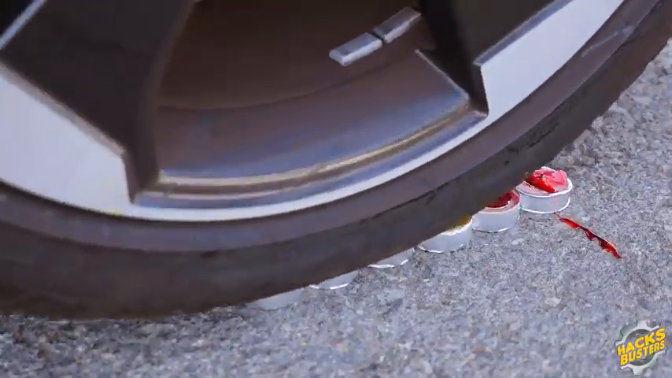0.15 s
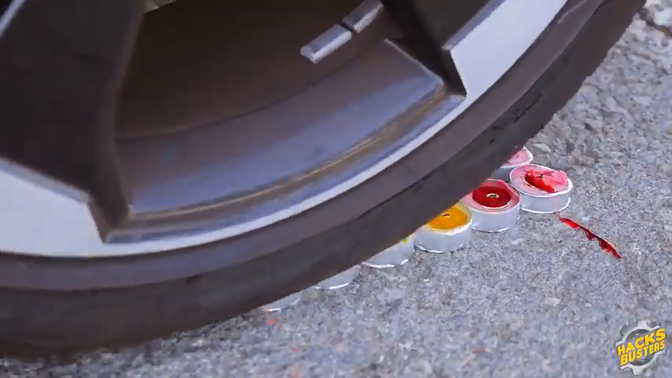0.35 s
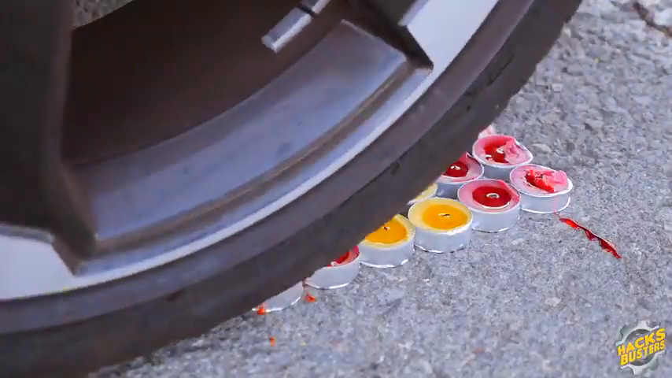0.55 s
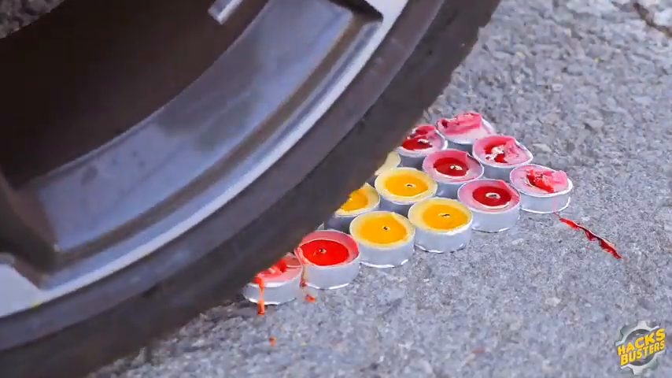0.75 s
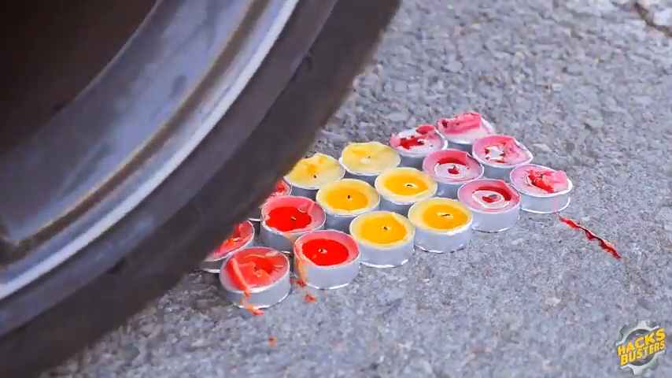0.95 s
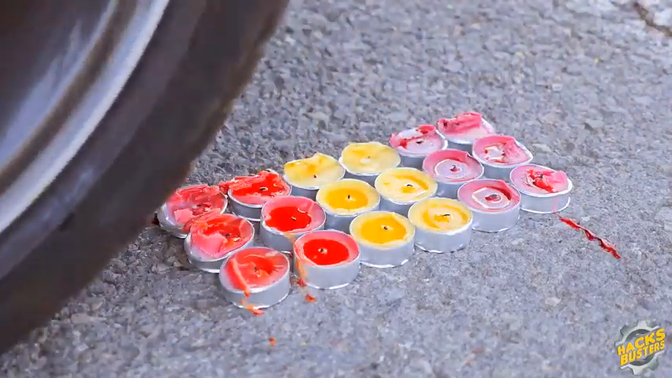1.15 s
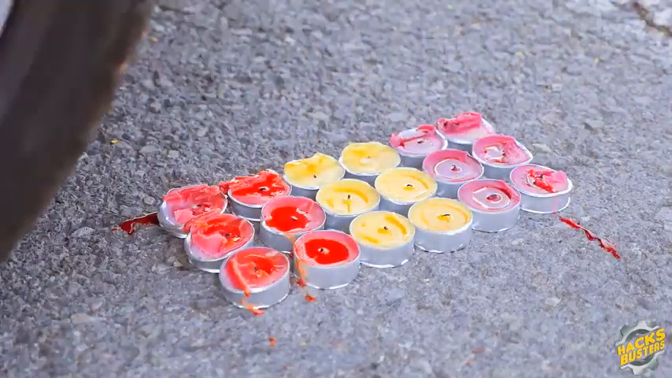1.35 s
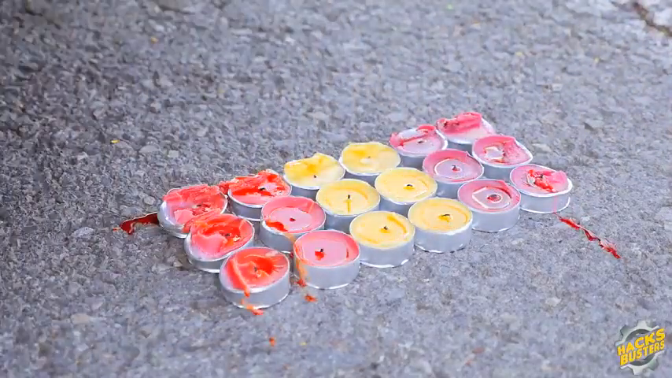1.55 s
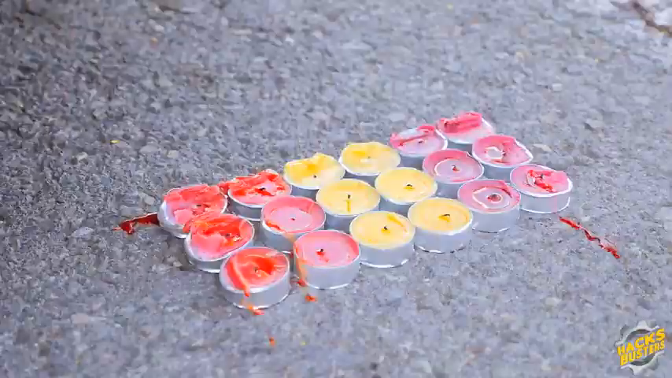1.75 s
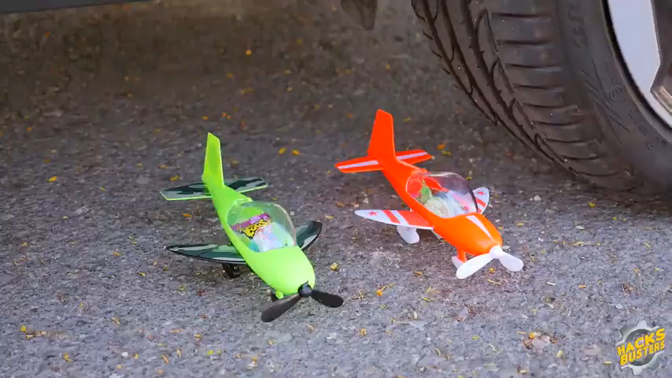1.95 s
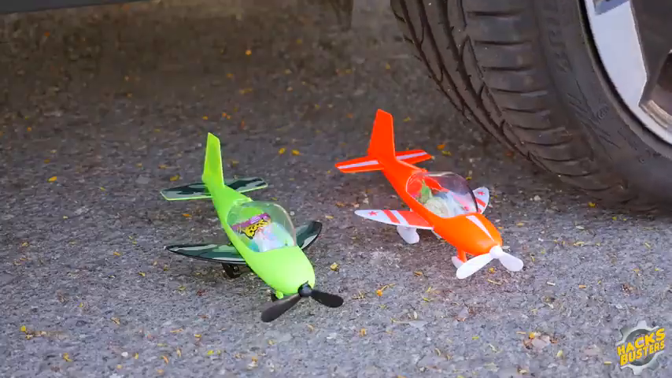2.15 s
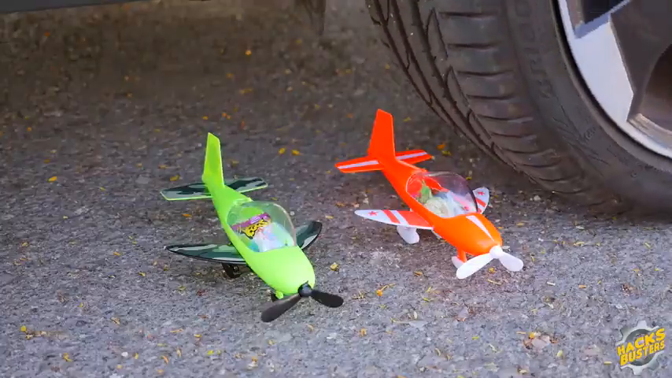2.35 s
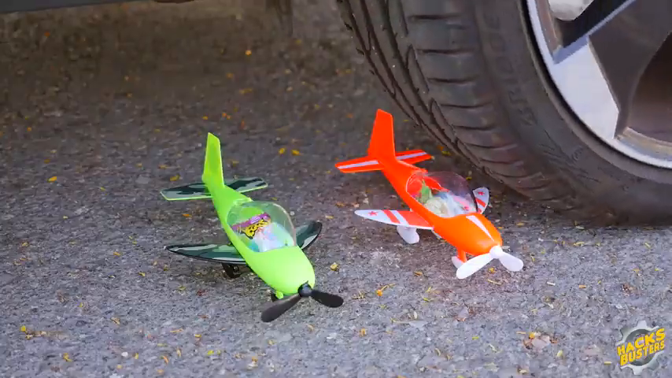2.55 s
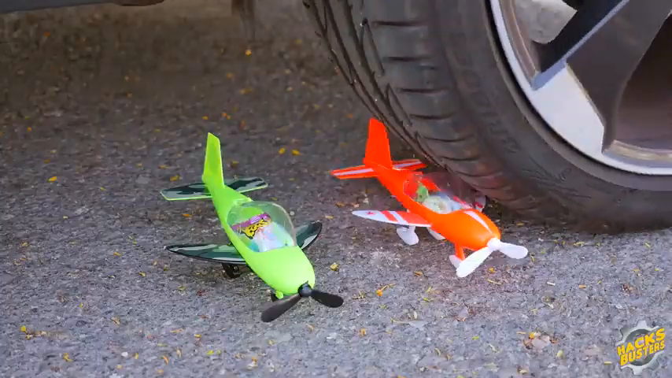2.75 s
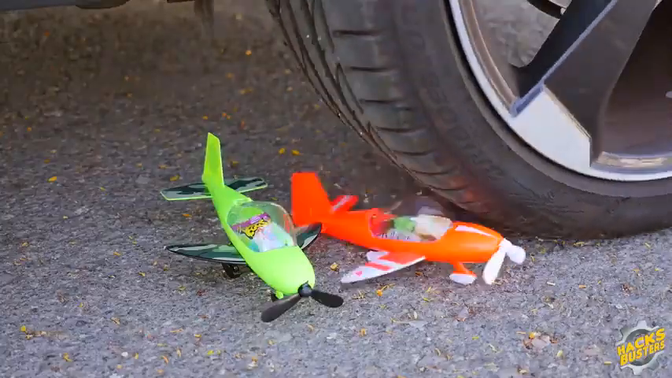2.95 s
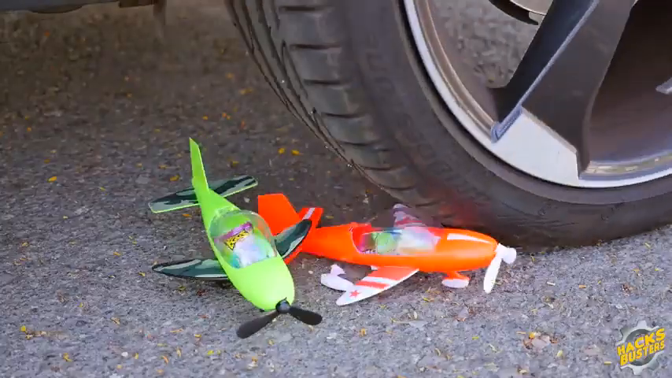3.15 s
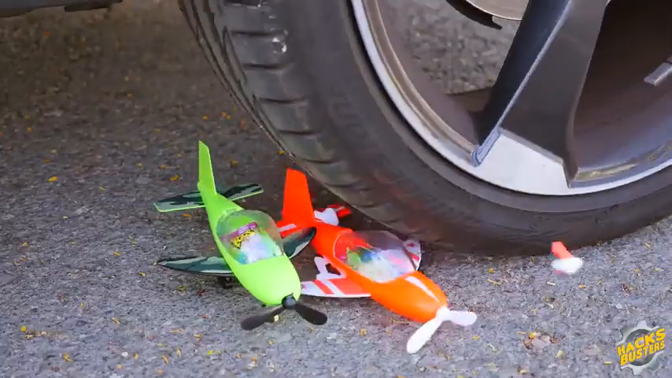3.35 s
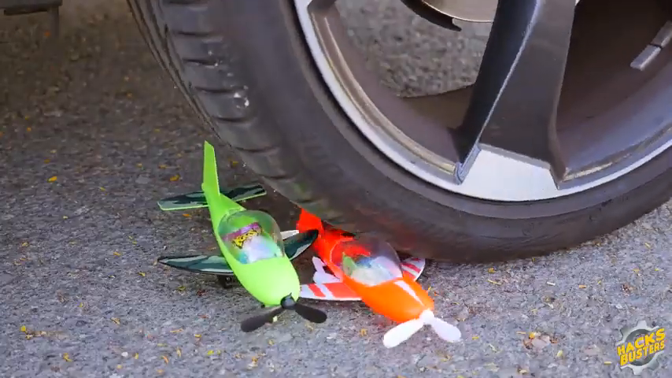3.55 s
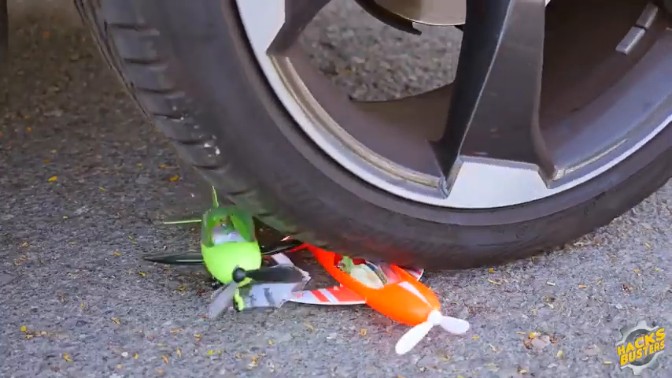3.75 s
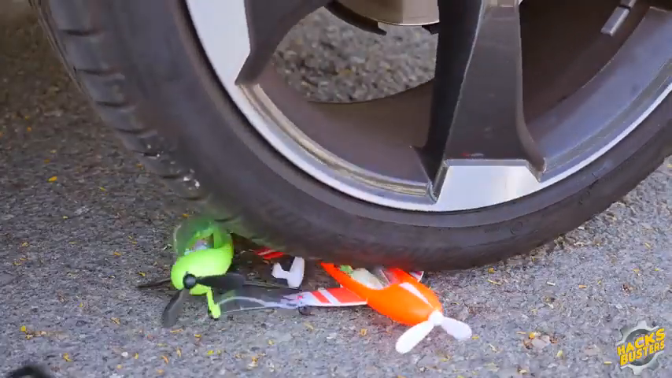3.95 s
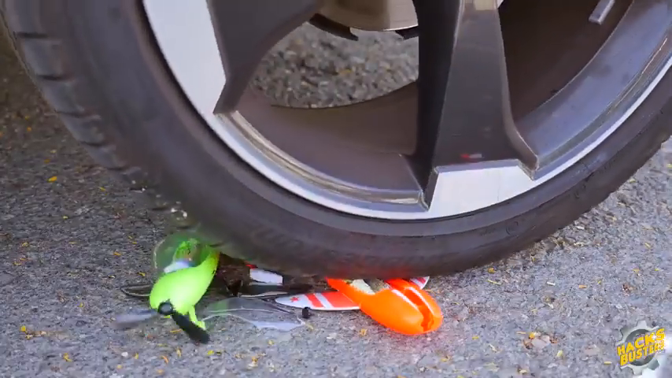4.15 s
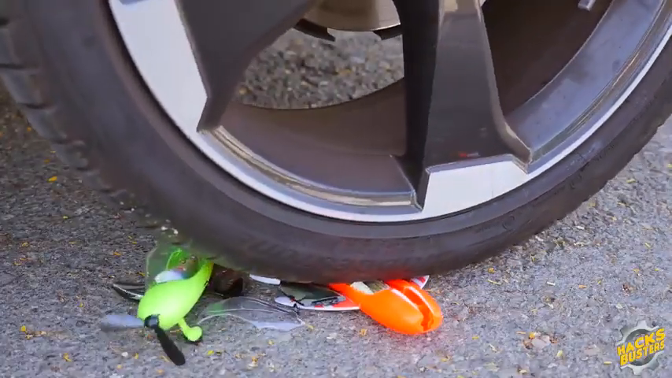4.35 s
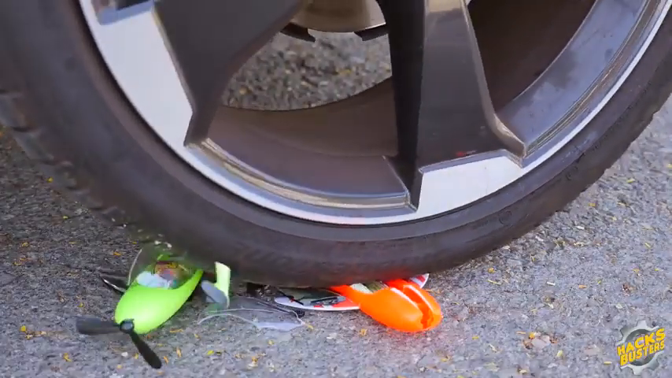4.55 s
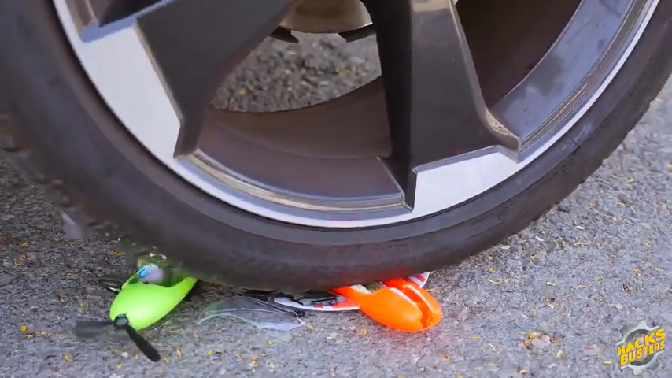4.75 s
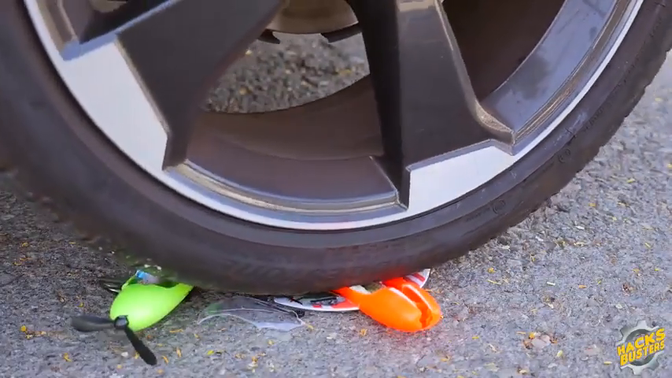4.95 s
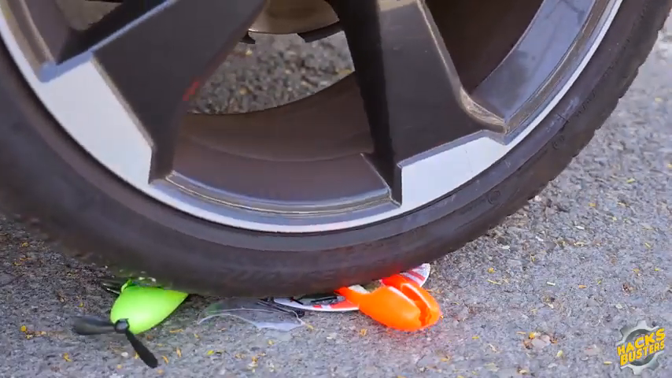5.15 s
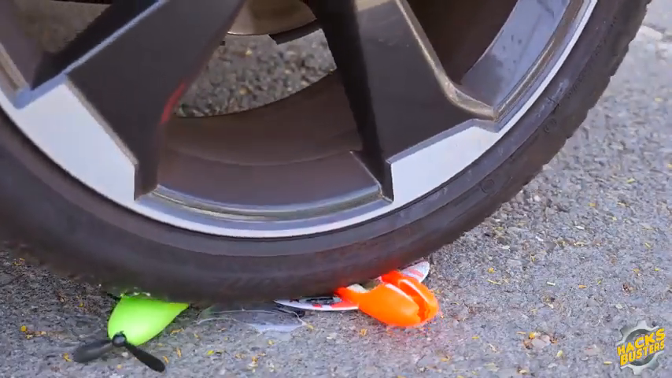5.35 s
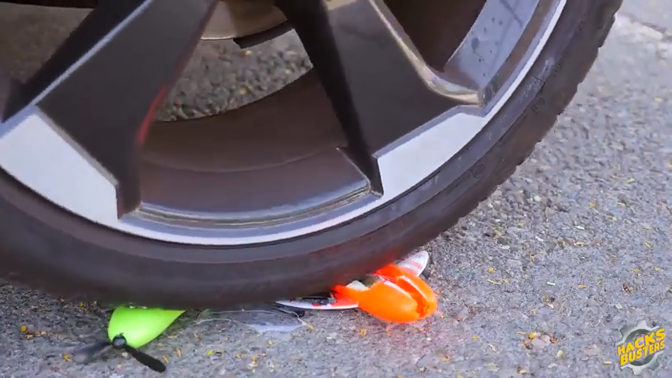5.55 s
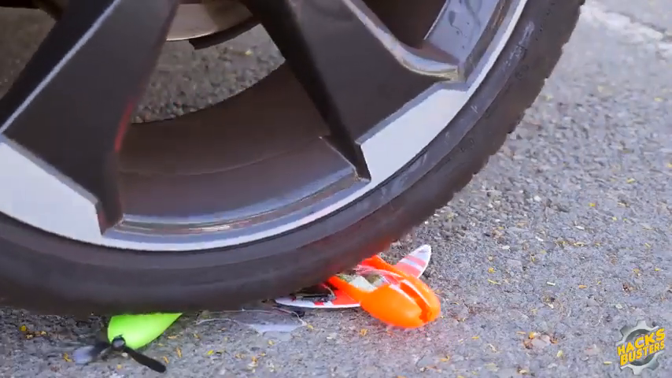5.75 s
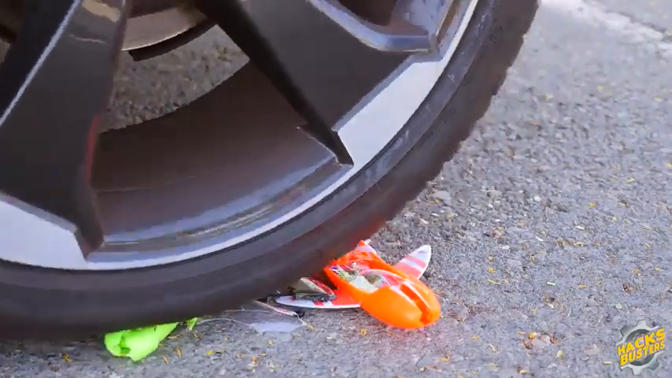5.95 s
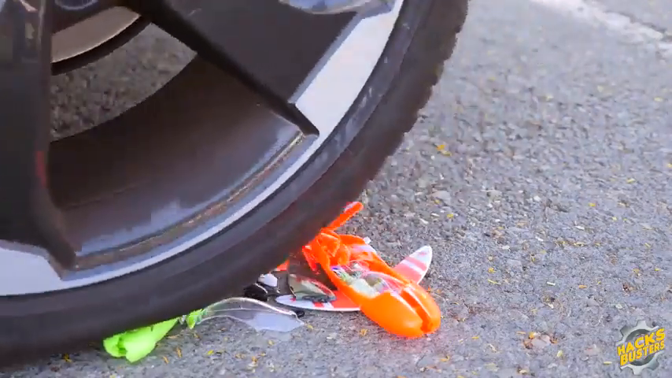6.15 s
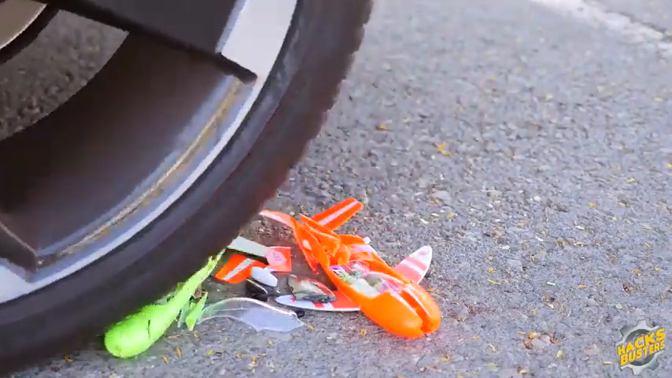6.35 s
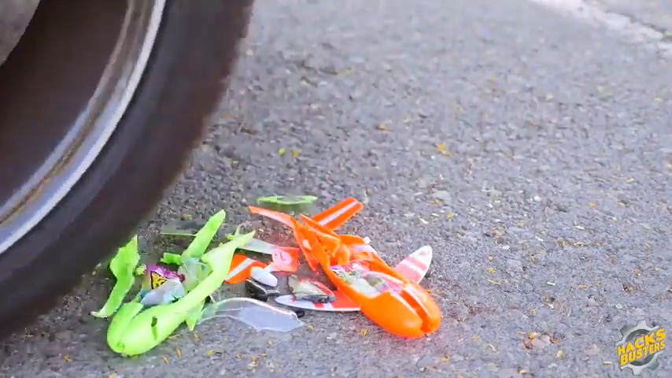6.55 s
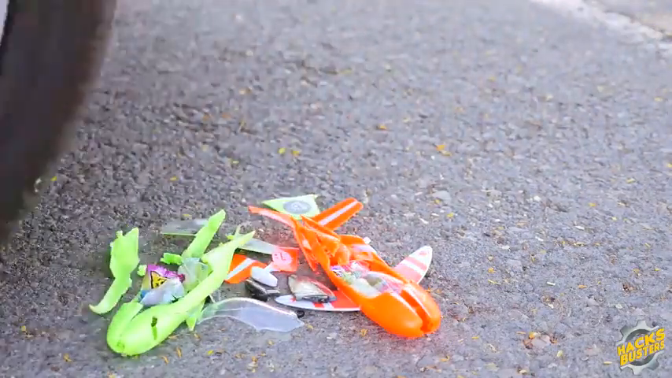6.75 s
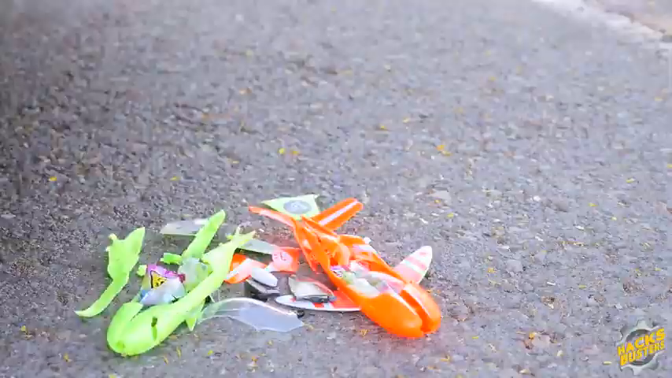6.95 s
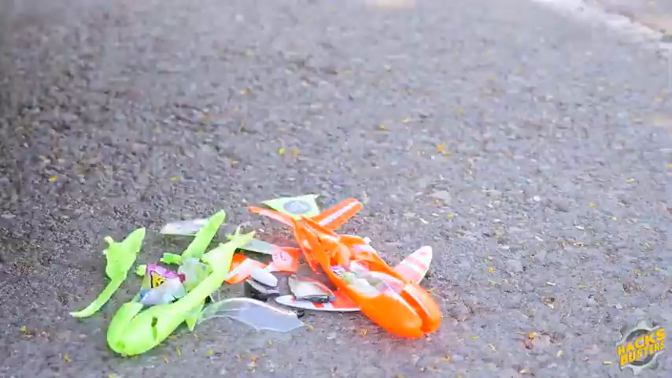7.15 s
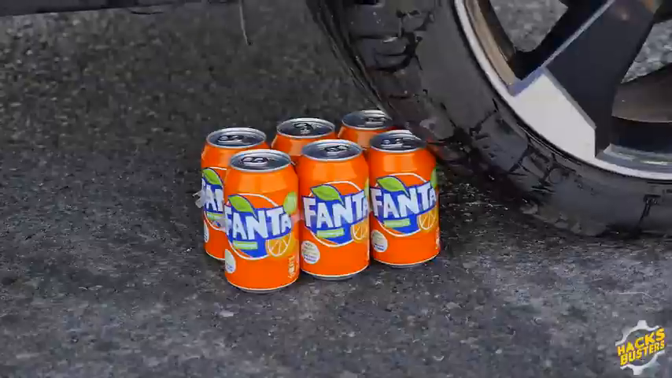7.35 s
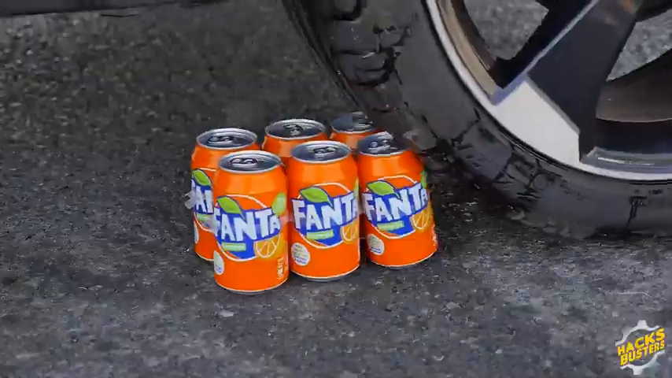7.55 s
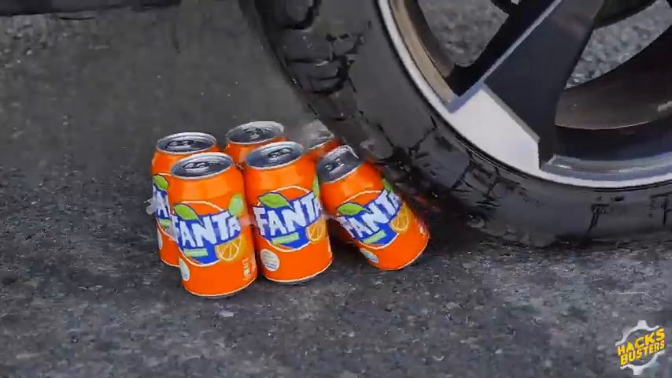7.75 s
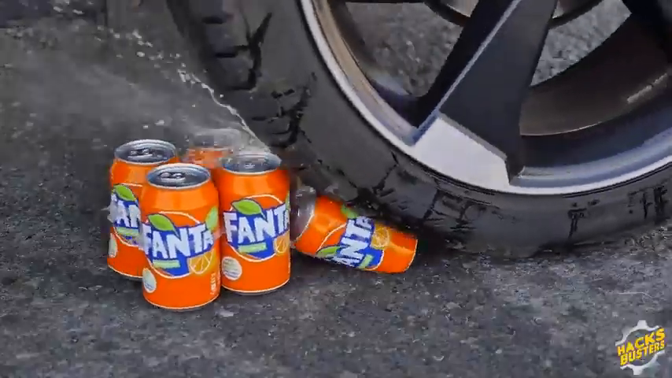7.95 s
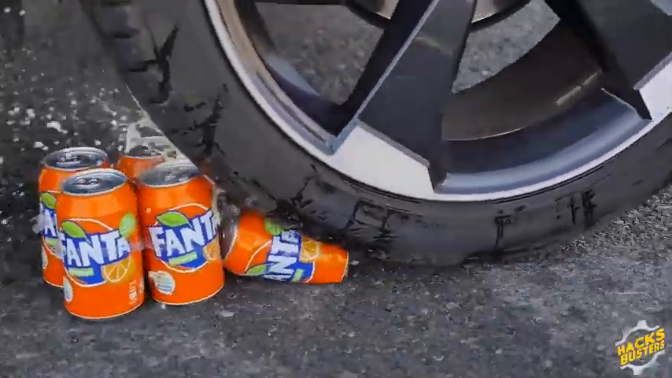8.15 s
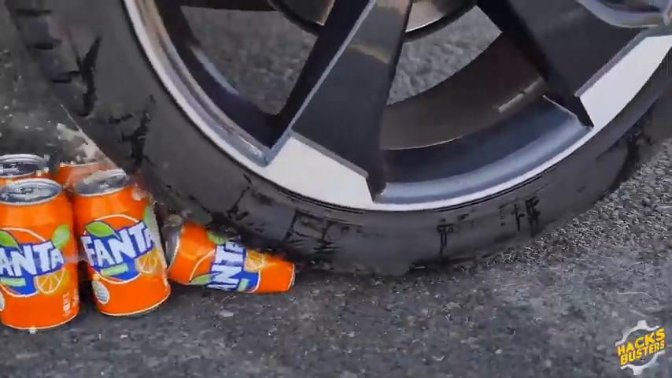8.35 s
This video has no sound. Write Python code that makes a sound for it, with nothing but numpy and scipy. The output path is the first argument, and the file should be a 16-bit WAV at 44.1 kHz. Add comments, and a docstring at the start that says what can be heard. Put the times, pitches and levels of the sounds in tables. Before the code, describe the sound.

Close by on asphalt, a car idles with soft airy hiss and a thin high whine, with two barely audible ticks. Then hollow plastic toys break under a tyre in loud, dense, irregular snaps with scraping fragments and tiny rings. The cracks thin to faint ticks and near quiet. Abruptly the engine is louder, and thin metal cans pop, boom, crumple and spray fizzy liquid until the end.

```python
"""First an idling car engine hisses and whines; two faint ticks follow as the car rolls off wax cups.
The car then cracks two plastic toys: noise bursts snap, pieces scrape, and small parts ring.
In a second shot the engine is suddenly louder, and fizzy drink cans crumple, boom, dent and spray.
Most sounds are shaped noise; the whine and the ringing parts are made of sine waves.
All is heard close by, on asphalt, through one microphone."""
import sys
import numpy as np
from scipy import signal
from scipy.fft import rfft, irfft, next_fast_len
from scipy.io import wavfile
from scipy.ndimage import map_coordinates

SR = 44100
rng = np.random.default_rng(int(sys.argv[2]) if len(sys.argv) > 2 else 0)


def transcribe(u):
    """Save the signal u as a 16-bit wav file named by the first command-line argument.

    u: samples, shape (n,) or (channels, n), limited to [-1, 1]; the rate is SR.
    q: integer samples, one column per channel.
    """
    v = np.clip(np.atleast_2d(u).T, -1, 1)
    q = np.round(v * 32767).astype(np.int16)
    wavfile.write(sys.argv[1], SR, q)


N = 374409  # length in samples


def amp(db):
    """Turns decibels into a plain multiplier."""
    return 10 ** (np.asarray(db) / 20)


def unit(x):
    """Scales a sound to an average (rms) strength of 1."""
    return x / np.sqrt(np.mean(x ** 2, axis=-1, keepdims=True) + 1e-20)


def curve(rows):
    """Joins (time, value) rows with straight lines, one value per sample."""
    return np.interp(np.arange(N) / SR, *np.transpose(rows))


def wobble(rate):
    """A smooth random curve with the given number of random points a second."""
    points = rng.standard_normal(int(N * rate / SR) + 4)
    return map_coordinates(points, [np.arange(N) * rate / SR])


def fade(t, t60):
    """Dies away by 60 dB in t60 seconds."""
    return amp(-60 * t / t60)


def onset(t, seconds):
    """Rises smoothly from silence; a smaller time makes a sharper start."""
    return 1 - np.exp(-t / seconds)


def colour(x, points):
    """Filters a sound through a tone curve of (Hz, dB) points, then sets its rms to 1."""
    size = next_fast_len(x.shape[-1] + 4096)
    f, db = np.transpose(points)
    log_f = np.log(np.fft.rfftfreq(size, 1 / SR) + 1)
    gain = amp(np.interp(log_f, np.log(f + 1), db))
    return unit(irfft(rfft(x, size) * gain, size)[..., :x.shape[-1]])


def piece(noise, points):
    """Noise in a given colour, with random resonances that make each piece differ."""
    bumps = list(zip(np.geomspace(300, 16000, num=70), rng.normal(0, 5, size=70)))
    return colour(colour(noise, points), bumps)


def grains(per_second, spread_db, t60):
    """Steady noise made rough by many short random bursts."""
    starts = rng.random(N) < per_second / SR
    hits = starts * amp(spread_db * np.minimum(rng.exponential(size=N), 3))
    # each hit dies away over t60; the 1 keeps a steady part beneath
    shape = signal.lfilter([1], [1, -fade(1 / SR, t60)], hits) + 1
    return shape * rng.standard_normal(N)


def add(track, s, sound):
    """Mixes a sound into a track at time s."""
    part = track[round(s * SR):][:len(sound)]
    part += sound[:len(part)]


def ring(modes, t, scatter_db):
    """A struck part rings as fading sine waves, with new strengths and phases for each blow."""
    hz, db, t60 = np.transpose(modes)[..., None]
    strength, phase = rng.standard_normal((2, len(modes), 1))
    level = amp(db + scatter_db * strength) * fade(t, t60)
    return np.sum(level * np.sin(2 * np.pi * hz * t + phase), axis=0)


# How loud the engine is; at 7.314 s a cut to another shot makes it suddenly louder: (t/s, level/dB)
ENGINE_LEVEL = [(0, -41.5), (.9, -43.5), (1.4, -52.5), (1.9, -53), (2.4, -48), (2.8, -38.5), (6, -54.5),
                (6.75, -62), (7.314, -57), (7.319, -36), (8.49, -28)]
# Tone of the engine hiss: (f/Hz, level/dB)
ENGINE_COLOUR = [(20, -20), (86, -5), (277, -2.5), (472, 1.5), (1610, -4.5), (2750, -2.5), (3950, -8.5),
                 (7110, -16.5), (11800, -19), (16000, -24.5)]
# Hollows under the car that strengthen some pitches: (f/Hz, level/dB)
UNDER_CAR = [(690, 4), (1260, 2), (1920, 7.5)]
# The whine's tones: (multiple of 1001 Hz, level/dB relative to the engine)
WHINE_TONES = [(4, -17), (8, -28)]


def engine():
    """Idling makes a hiss, coloured by the hollows under the car, and a thin electric whine."""
    t = np.arange(N) / SR
    peaks = []
    for hz, db in UNDER_CAR:
        peaks += [(hz * .95, 0), (hz, db), (hz * 1.05, 0)]
    hiss = colour(colour(rng.standard_normal(N), ENGINE_COLOUR), peaks)
    whine = sum(amp(db) * np.sin(2 * np.pi * k * 1001.0 * t) for k, db in WHINE_TONES)
    return amp(curve(ENGINE_LEVEL)) * (hiss + whine)


# Tone of cracking, also used for the chips and snaps below: (f/Hz, level/dB)
CRACK_COLOUR = [(1180, -21.5), (2000, -5.5), (4900, -0.5), (11700, -4), (16000, -10.5)]
# Small cracks in grit and broken pieces: (t/s, level/dB)
SMALL_CRACKS = [(.807, -39), (.975, -38.5), (2.951, -19.5), (3.286, -22.5), (3.327, -18.5), (3.6978, -8),
                (3.9004, -13.5), (4.1838, -23), (4.3217, -18.5), (4.3413, -17), (4.4406, -11.5),
                (4.511, -22), (4.826, -15.5), (4.9828, -23), (5.0143, -19.5), (5.032, -20.5),
                (5.0737, -16.5), (5.1174, -26.5), (5.145, -21.5), (5.343, -22.5), (5.3792, -12),
                (5.6094, -38), (5.631, -35), (5.802, -30), (5.8285, -23.5), (5.9357, -26), (6.241, -28),
                (6.253, -23), (6.3023, -25.5), (6.3312, -23.5), (6.4823, -19.5), (6.5384, -27),
                (6.672, -32), (6.7319, -35.5), (6.8557, -44), (6.987, -35.5), (7.181, -47)]


def ticks():
    """A small crack is over in a few milliseconds and leaves a faint rattle."""
    out, t = np.zeros(N), np.arange(SR // 10) / SR
    for s, db in SMALL_CRACKS:
        noise = piece(rng.standard_normal(len(t)), CRACK_COLOUR)
        crack_and_rattle = fade(t, 0.01) + amp(-13) * fade(t, 0.063)
        add(out, s, amp(db) * noise * crack_and_rattle)
    return out


# Broken plastic scraping under the tread: (t/s, level/dB)
SCRAPE_LEVEL = [(2.78, -90), (2.8, -50.5), (3.08, -24.5), (3.14, -35), (3.19, -27), (3.26, -27),
                (3.305, -47.5), (3.335, -30.5), (3.43, -33.5), (3.46, -26), (3.585, -41), (4.4, -37),
                (4.9, -46), (5.9, -44.5), (6.55, -44), (6.8, -61), (7.3, -73)]


def scrape():
    """Crushed pieces grate, each in its own fits and starts, among sparse tiny ticks."""
    tone = [(350, -13.0), (700, 1.5), (5500, -2.5), (16000, -16)]  # (f/Hz, level/dB)
    grit = []
    for _ in range(5):
        fits_and_starts = amp(6 * wobble(20))
        grit.append(fits_and_starts * piece(grains(450, spread_db=4, t60=.018), tone))
    chips = colour(grains(90, spread_db=8.5, t60=.007), CRACK_COLOUR)
    return amp(curve(SCRAPE_LEVEL)) * (unit(np.sum(grit, axis=0)) + amp(-6) * chips)


# Plastic breaking: (t/s, level/dB, level of the hollow body relative to the crack/dB)
BREAKS = [(2.8371, -12, -5.5), (2.896, 0, -12.5), (3.0061, -5.5, -10), (3.0256, 6, -14.5),
          (3.371, 0.5, -15.5), (3.603, -5, -33), (3.6384, -3.5, -11.5), (3.655, 1, -11), (3.6792, -2, -13),
          (3.7304, -4, -13.5), (3.7661, 3.5, -13), (3.8363, -5.5, -21.5), (3.942, -8.5, -22),
          (3.9874, 6, -13.5), (4.0741, -3, -7.5), (4.1091, 0, -7.5), (4.227, -9.5, -53),
          (4.245, -13.5, -11), (4.2706, -5, -27), (4.2958, -12.5, -8), (4.359, -8, -17.5),
          (4.3785, -10.5, -14), (4.4219, -10, -20.5), (4.4522, -8.5, -11), (4.475, -1.5, -19.5),
          (4.534, -4.5, -33), (4.556, -14.5, -4.5), (4.5702, -6.5, 3.5), (4.585, 0, -39),
          (4.639, -14, -11.5), (4.6767, -10, -18.5), (4.7427, 1, -23.5), (4.8386, 0, -6.5),
          (4.9942, -17, -8.5), (5.2325, -1, -8), (5.2398, -5.5, -20), (5.419, -1, -10.5),
          (5.459, -1.5, -2.5), (5.656, -15, -17.5), (5.7279, -8.5, -20.5), (5.777, -19, -10.5),
          (5.9557, -3, -12.5), (5.9854, 1, -8.5), (6.034, -13.5, 3), (6.107, -19, 4.5), (6.3616, -14, -13)]


def snaps():
    """A break is a short burst and a rattle; the hollow body and the tyre answer lower and longer."""
    out, t = np.zeros(N), np.arange(SR // 5) / SR
    body_tone = [(350, -20.0), (650, 2.5), (2200, -7.0), (3500, -25.5)]  # (f/Hz, level/dB)
    tyre_tone = [(160, -30.5), (235, -0.5), (420, -6.5), (700, -22)]
    for s, db, body_db in BREAKS:
        noise = rng.standard_normal((3, len(t)))
        # a stronger break leaves a stronger rattle
        edge_fade = fade(t, 0.0091) + amp(-9.5 + 0.18 * db) * fade(t, 0.069)
        edge = piece(noise[0], CRACK_COLOUR) * edge_fade
        body_fade = fade(t, 0.017) + amp(-9.0) * fade(t, 0.081)
        body = piece(noise[1], body_tone) * body_fade
        thud = colour(noise[2], tyre_tone) * fade(t, 0.11) * onset(t, 0.00067)
        sound = edge + amp(body_db) * (body + amp(-15.0) * thud)
        add(out, s, amp(db) * onset(t, 0.00015) * sound)
    return out


# Small stiff pieces ringing, one pitch per row; the rows near 6.16, 6.26 and 6.4 s are pitches of one part
# struck again and again: (t/s, level/dB, f/Hz)
SHARD_RINGS = [(3.441, -24, 5500), (3.44, -34, 3800), (3.535, -29, 3780), (4.7115, -39.5, 6440),
               (4.86, -37, 1270), (5.029, -36, 1264), (6.156, -34.5, 3740), (6.157, -41, 1820),
               (6.256, -40, 3780), (6.4, -36.5, 1824), (6.522, -40.5, 4430), (6.735, -52, 3750),
               (7.09, -53, 6480)]


def shards():
    """Each row rings at one pitch; higher pitches die away sooner."""
    out, t = np.zeros(N), np.arange(SR // 4) / SR
    for s, db, hz in SHARD_RINGS:
        t60 = 0.19 * (2000 / hz) ** .5  # seconds; 0.19 at 2000 Hz
        add(out, s, ring([(hz, db, t60)], t, scatter_db=1))
    return out


# A hard loose part struck: (t/s, level/dB)
PART_BLOWS = [(5.1494, -14), (5.2952, -15), (5.398, -16)]
# The pitches at which that part rings: (f/Hz, level/dB, time to fade by 60 dB/s)
PART_MODES = [(2280, -15, .14), (3452, -17, .11), (5720, -14, .09), (6455, -8, .04), (9100, -12, .05)]


def pings():
    """A stiff small part rings at a few clear pitches."""
    out, t = np.zeros(N), np.arange(SR // 4) / SR
    for s, db in PART_BLOWS:
        add(out, s, amp(db) * ring(PART_MODES, t, scatter_db=2.5) * onset(t, 0.00056))
    return out


# Pitches that the can walls favour: (f/Hz, level/dB)
CAN_PITCHES = [(520, -8), (950, 2.5), (1250, -4), (2150, 0.5), (3000, 4), (4700, 2.5), (6500, -1.5)]


def creases():
    """Folding metal excites the walls' favoured pitches, each flaring up and fading on its own."""
    bands = []
    for hz, db in CAN_PITCHES:
        band = [(hz * 0.79, -35), (hz, 0), (hz * 1.24, -35)]
        flare = amp(db + 6.5 * wobble(35))
        bands.append(flare * colour(rng.standard_normal(N), band))
    return unit(np.sum(bands, axis=0))


# Cans giving way under the tread: (start t/s, rise/s, hold/s, crumpling level/dB, spray level/dB)
CAN_CRUSHES = [(7.471, 0.0061, 0.014, -24.5, -48), (7.666, 0.0012, 0.17, -23, -15),
               (7.85, 0.022, 0.099, -28, -25.5), (7.935, 0.0075, 0.12, -42, -16),
               (8.062, 0.027, 0.0049, -18, -13.5), (8.117, 0.047, 0.082, -16, -20),
               (8.238, 0.016, 0.026, -12, -36), (8.318, 0.037, 0.023, -12, -33),
               (8.402, 0.04, 0.059, -16.5, -29)]
# Loss of level while a can holds out, and once it has given way
SAG_DB_PER_S, FALL_DB_PER_S = 69, 359


def squeezes():
    """Loudness of crumpling and spray: each crush rises, holds while it sags, then falls away."""
    s, rise, hold, *levels = np.transpose(CAN_CRUSHES)[..., None]
    first = round(CAN_CRUSHES[0][0] * SR)  # no crush starts before this sample
    t = np.arange(first, N) / SR - s
    sag = SAG_DB_PER_S * np.clip(t - rise, 0, hold)
    fall = FALL_DB_PER_S * np.clip(t - rise - hold, 0, None)
    shape = np.clip(t / rise, 0, 1) ** 2 * amp(-(sag + fall))
    gains = []
    for db in levels:
        total = np.sqrt(np.sum((amp(db) * shape) ** 2, axis=0))
        gains.append(np.pad(total, (first, 0)))
    return gains


# Tone of crumpling metal, also used for the dents below: (f/Hz, level/dB)
CRUMPLE_COLOUR = [(100, -51), (227, -0.5), (507, -3), (962, 1), (6320, -7.5), (12000, -19.5), (15600, -46)]
# Tone of the drink jetting out: (f/Hz, level/dB)
SPRAY_COLOUR = [(1760, -15), (3000, -1.5), (10300, -8), (16000, -7.5)]


def crushed_cans():
    """Thin metal crumples in dense bursts while the drink jets out as rough hiss."""
    crumple = colour(grains(300, spread_db=1, t60=0.0061), CRUMPLE_COLOUR) + creases()
    spray = colour(grains(440, spread_db=8.0, t60=0.051), SPRAY_COLOUR)
    crumple_gain, spray_gain = squeezes()
    return crumple_gain * amp(2.64 * wobble(30)) * crumple + spray_gain * spray


# A can wall booming near one pitch: (t/s, level/dB, f/Hz)
WALL_BOOMS = [(7.474, -10, 308), (7.476, -24, 1060), (7.487, -23, 2050), (7.479, -16.5, 3810),
              (7.509, -10.5, 850), (7.54, -17, 433), (7.606, -20, 454), (7.709, -13, 2254),
              (7.86, -18, 2140), (7.939, -8.5, 969)]


def can_walls():
    """A can wall booms as a narrow band of noise; higher ones last longer."""
    out, t = np.zeros(N), np.arange(SR // 5) / SR
    for s, db, hz in WALL_BOOMS:
        band = [(hz - 250, -24), (hz, 0), (hz + 350, -20), (hz + 1500, -50)]
        boom = colour(rng.standard_normal(len(t)), band)
        add(out, s, amp(db) * fade(t, 0.0022 * hz ** .5) * boom * onset(t, 0.00083))
    return out


# Can walls buckling: (t/s, level/dB)
CAN_DENTS = [(7.478, -15), (7.51, -16), (7.668, -10.5), (7.927, -8), (7.941, -7.5), (8.025, -21),
             (8.082, -12.5), (8.176, -8.5), (8.214, -16), (8.245, -7.5), (8.265, -7.5), (8.35, -15)]


def dents():
    """A can wall buckles with a crack and a longer, weaker tail."""
    out, t = np.zeros(N), np.arange(SR // 5) / SR
    for s, db in CAN_DENTS:
        noise = colour(rng.standard_normal(len(t)), CRUMPLE_COLOUR)
        add(out, s, amp(db) * noise * (fade(t, 0.012) + amp(-5) * fade(t, 0.1)))
    return out


def scene():
    """One microphone feeds both channels; small objects radiate no deep bass."""
    plastic = snaps() + ticks() + scrape() + pings() + shards()
    cans = dents() + can_walls() + crushed_cans()
    bass_cut = signal.butter(2, 110, "high", fs=SR, output="sos")
    mono = engine() + signal.sosfilt(bass_cut, plastic + cans)
    return np.array([mono, mono])


TOP_HZ = 16400  # nothing passes above this


def record(dry):
    """Loud breaks clip near full scale; the treble falls steeply over the last 800 Hz below the top."""
    clipped = np.clip(dry, -.97, .97)
    size = next_fast_len(N + 4096)
    gain = np.clip((TOP_HZ - np.fft.rfftfreq(size, 1 / SR)) / 800, 0, 1) ** 2
    return irfft(rfft(clipped, size) * gain, size)[:, :N]


dry = scene()
out = record(dry)
transcribe(out)
```